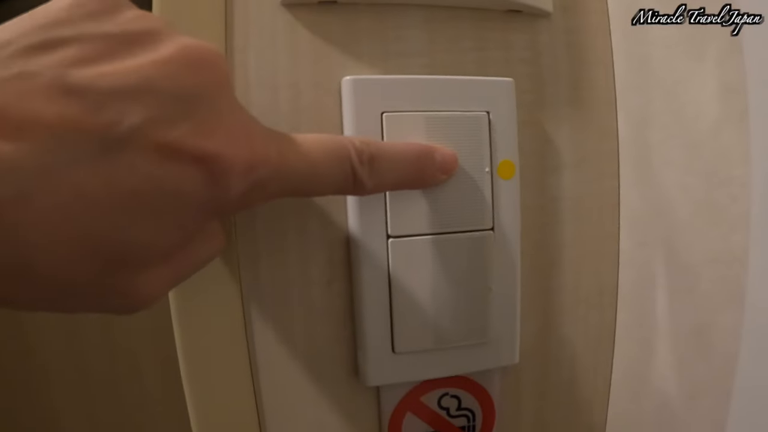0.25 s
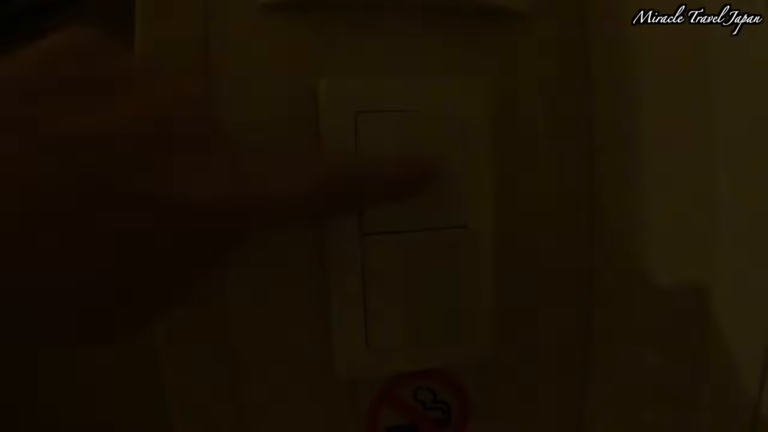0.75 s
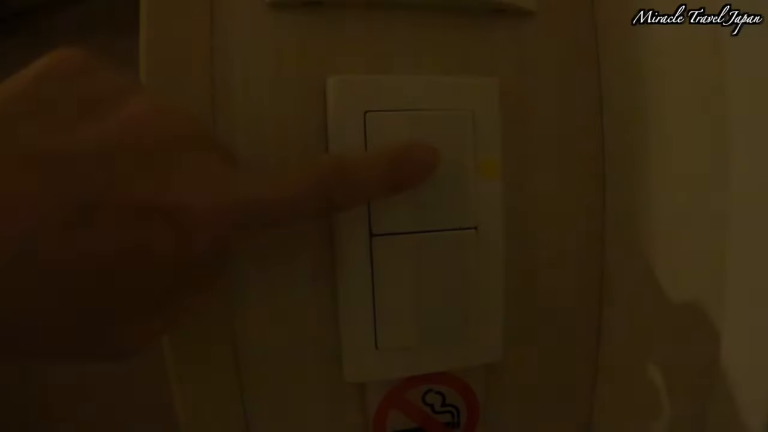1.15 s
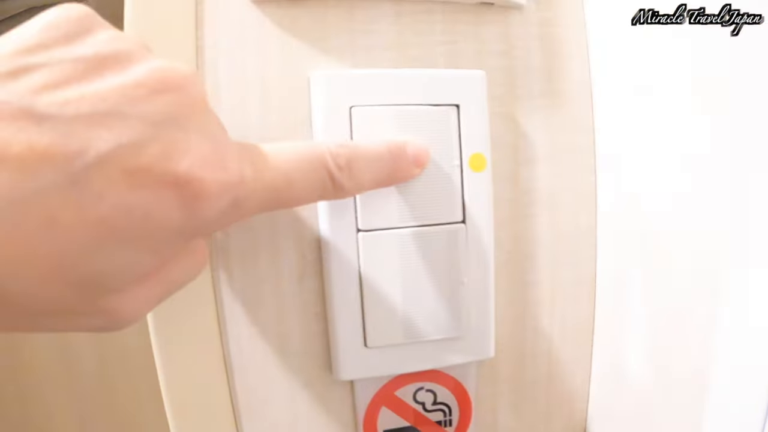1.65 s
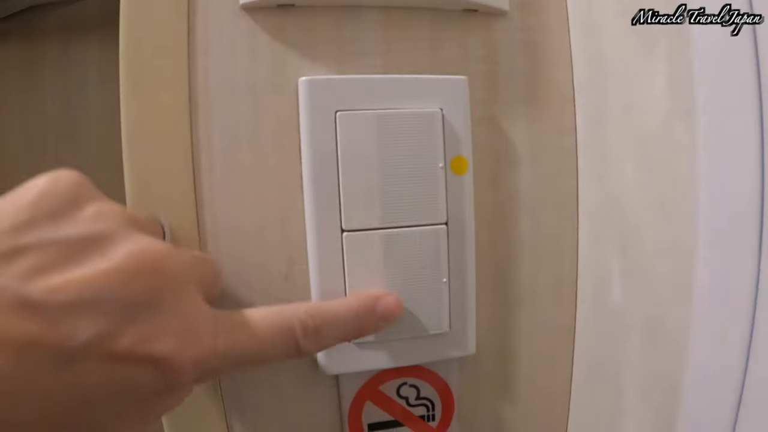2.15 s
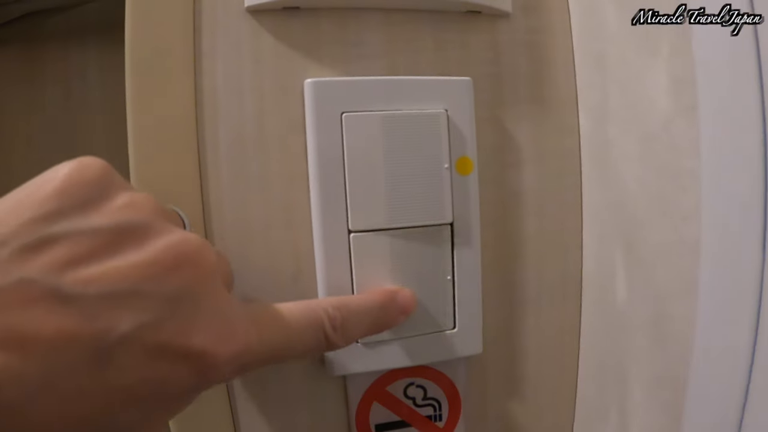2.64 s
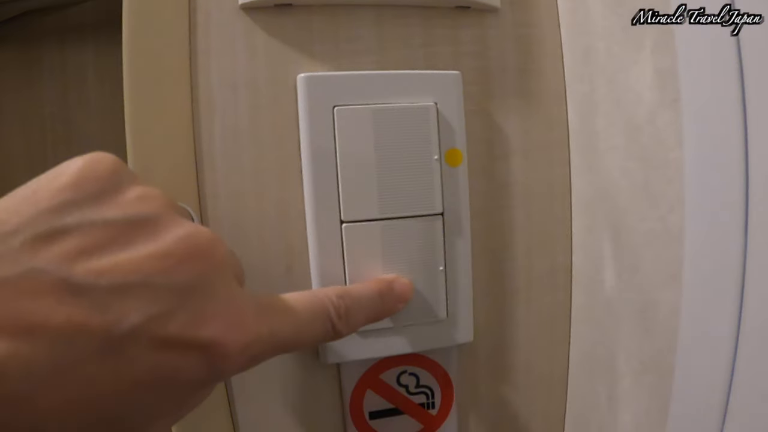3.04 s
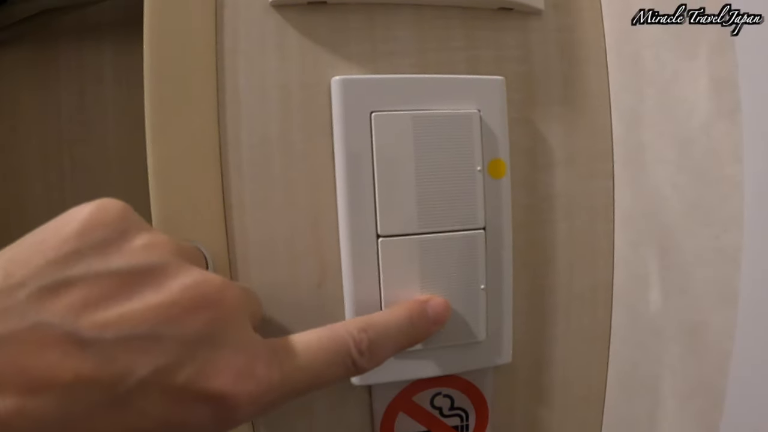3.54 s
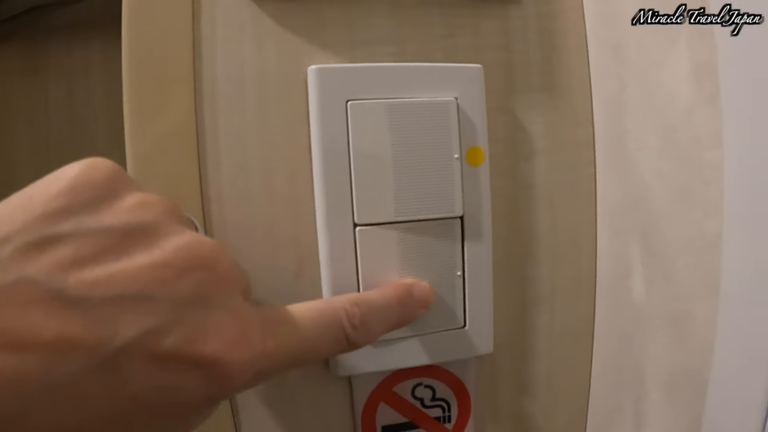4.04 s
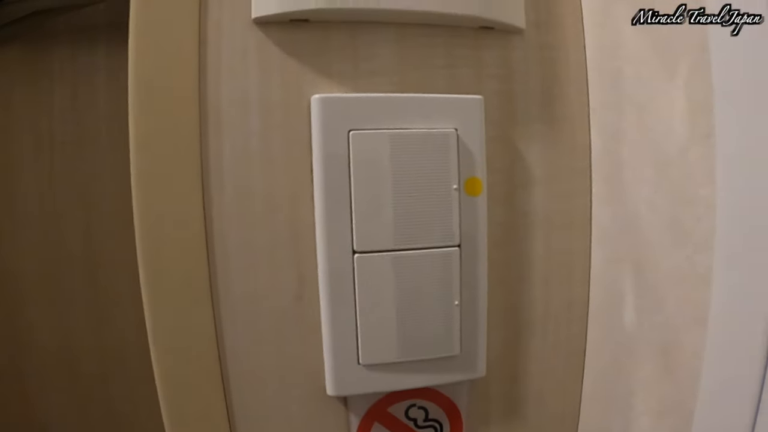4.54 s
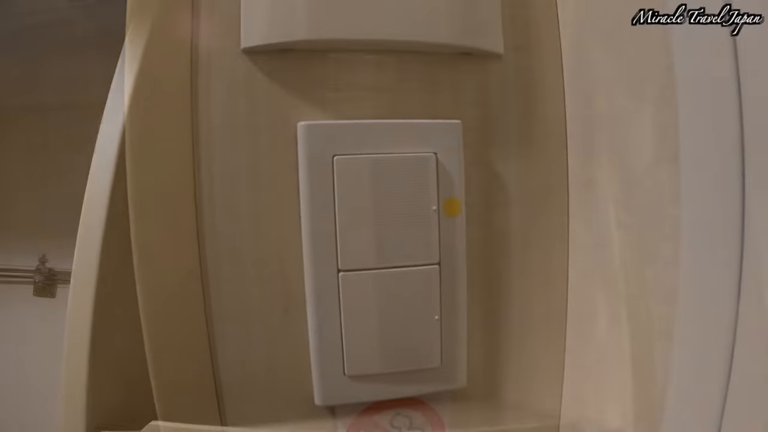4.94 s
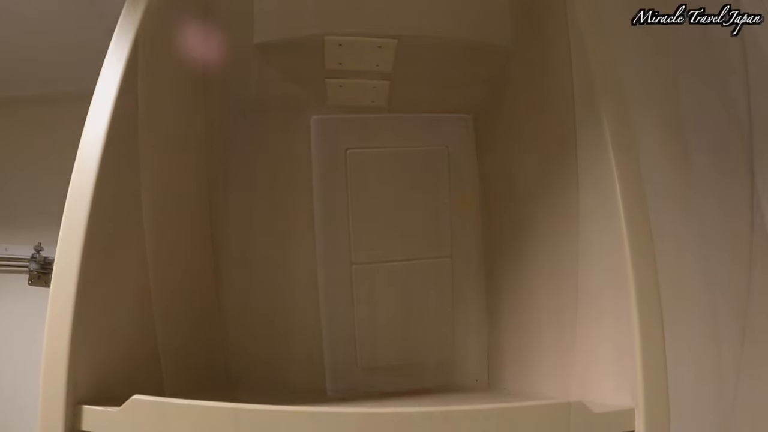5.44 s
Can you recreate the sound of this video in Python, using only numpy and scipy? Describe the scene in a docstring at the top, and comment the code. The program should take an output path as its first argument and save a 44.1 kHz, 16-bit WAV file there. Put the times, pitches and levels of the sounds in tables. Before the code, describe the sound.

A deep, boomy ship engine hum around 100 Hz wavers throughout, with lower rumble, hull drone, very faint air hiss and barely audible fan whine. Close to the microphone, a finger works plastic rocker switches on a hollow panelled wall. A small touch tick at 0.3 s leads to a loud, bright snap with a woody thump at 0.5 s, then a lighter release click at 0.77 s. The pattern repeats: snap at 1.65 s, release at 1.95 s; snap at 2.7 s, a softer stuttering release at 3.1 s; snap at 3.85 s, release at 4.15 s. Soft touches and short skin rubs come before many clicks. Each crack is dry and very short, with a faint springy ring and brief small-room echo. From 4.2 to 5.3 s the background crossfades to another place aboard, with thinner mid drone and slightly clearer whine; low hum continues to the end, about 5.5 s.

```python
"""Plastic rocker switches are worked by a finger on the panelled wall of a ship cabin, close to a camera.
Throughout, filtered noise makes the hull's wavering engine hum, rumble, drone, ventilation hiss and fan whines.
Skin and plunger rub as noise through the plastic modes; each contact then cracks by ringing those modes,
thumps the modes of the hollow wall a moment later, and dies in the cabin's diffuse echoes.
From 4.2 s to 5.3 s a crossfade leads to another place aboard, where drone and whines differ."""
import sys
import numpy as np
from scipy import signal
from scipy.fft import rfft, irfft, next_fast_len
from scipy.io import wavfile
from scipy.ndimage import uniform_filter1d

SR = 44100
rng = np.random.default_rng(int(sys.argv[2]) if len(sys.argv) > 2 else 0)


def digitize_waveform(pressure):
    """Quantize a signal to 16-bit integers and store it at the path in sys.argv[1].

    Rows of a 2-D input are taken as channels; values are limited to [-1, 1].
    """
    field = np.atleast_2d(pressure).T
    bounded = np.clip(field, -1, 1)
    quanta = np.round(bounded * 32767).astype(np.int16)
    wavfile.write(sys.argv[1], SR, quanta)


N = 250929  # length in samples

# Noise spectra of the ship. Each row: frequency in Hz, relative density in dB per Hz.
HUM_SPECTRUM = [(30, -150), (60, -45.5), (74, -10.5), (84, 2.5), (93, 4), (99, 1), (105, -25.5),
                (130, -83.5), (250, -170)]  # the hull's booming resonance
RUMBLE_SPECTRUM = [(8, -61), (14, -24), (22, -10), (31, -0.5), (40, -7), (50, -5.5), (62, -12.5), (72, -28),
                   (110, -120)]
DRONE_SPECTRUM = [(62, -31), (105, 1.5), (118, -9), (183, -10), (201, -10.5), (220, -26), (253, -15),
                  (314, -25.5), (337, -27), (365, -24.5), (408, -31.5), (431, -38.5), (700, -58.5),
                  (910, -87.5), (1540, -120)]
AIR_SPECTRUM = [(350, -31.5), (600, -5), (779, -9.5), (824, -11), (1270, -7.5), (3170, -20.5),
                (3890, -25.5), (7260, -23), (9000, -38), (11700, -59.5), (19800, -120)]
# Stereo width of the ship noise. Each row: frequency in Hz, side minus mid in dB.
SHIP_SIDE = [(60, -41.5), (110, -34.5), (200, -28.5), (360, -17), (660, -4.5), (1200, -3.5), (2190, -5.5),
             (3980, -2.5), (7240, -5), (13200, -1)]
# Fan whines. Each row: frequency in Hz, width in Hz, level in the first place in dB, in the second in dB.
WHINES = [(514, 34, -72.5, -64.5), (764, 29, -79, -82)]
# The crossfade to another place aboard, where drone and whines differ: start in seconds, end in seconds.
CROSSFADE_S = (4.2, 5.3)
# Gain on the drone in the second place. Each row: frequency in Hz, gain in dB.
SECOND_DRONE_GAIN = [(130, 0), (260, -10), (450, -3.5)]
# Cabin echoes by octave band. Each row: centre in Hz, decay time t60 in seconds, relative level in dB.
CABIN_BANDS = [(250, 0.57, -17.5), (493, 0.31, -11), (1063, 0.25, -12.5), (2020, 0.26, -18.5),
               (4220, 0.24, -19.5), (7000, 0.15, -15.5), (12100, 0.14, -27)]
# Stereo width of the echoes. Each row: frequency in Hz, side minus mid in dB.
CABIN_SIDE = [(60, -49), (110, -47.5), (200, -27.5), (360, -17), (660, -9), (1200, -7), (2190, -6),
              (3980, -4.5), (7240, -6), (13200, 0.5)]
# Skin and plunger sliding. Each row: start in seconds, swell in ms, fade in ms, rms at the crest in dB.
RUBS = [(0.255, 24, 61, -63), (0.738, 40, 15, -50.5), (1.442, 11, 34, -75), (1.516, 10.6, 20, -69.5),
        (1.917, 58, 15, -51), (2.414, 38, 28, -61.5), (2.549, 12, 28, -77), (3.041, 74, 23, -53),
        (3.624, 40, 28, -69.5), (4.107, 55, 29, -50)]
# Modes of the plastic rocker, its thin top and the wall panel.
# Each row: frequency in Hz, relative level in dB, decay time t60 in seconds.
ROCKER_MODES = [(1660, -7.5, 0.0019), (1890, 4.5, 0.0046), (2824, -2, 0.0067), (3575, 2, 0.0049),
                (4345, -4.5, 0.0091), (4770, -5, .005)]
TOP_MODES = [(5770, -2.5, 0.0036), (6770, -0.5, 0.0029), (7520, 0, 0.0037), (8390, -6.5, 0.0048),
             (9370, -8.5, 0.0026), (11600, -11.5, 0.0022)]
WALL_MODES = [(236, -10, 0.069), (389, -10, 0.092), (452.6, -0.5, 0.046), (477, 1, 0.032), (586, -1, 0.031),
              (912, -10.5, 0.028), (1065, -8, .05), (1210, -6, 0.0067)]
# Contacts: touch, snap, slips and release. Each row: start in seconds, peak of the crack in dB, peak of
# the thin top in dB, peak of the wall thump in dB, thump lag in ms, favoured rocker pitch in Hz.
CONTACTS = [(0.2677, -55.5, -56, -47, 3.4, 4500), (0.2858, -35.5, -38, -33.5, 0.72, 1750),
            (0.5038, -13, -16, -4, 2.9, 3600), (0.7721, -23, -37.5, -33.5, 4.5, 2896),
            (0.7747, -22, -32, -24, 3.94, 3270), (1.4491, -54.5, -58.5, -39.5, 1.5, 1897),
            (1.6499, -8.5, -15, -7, 3, 3960), (1.922, -41, -53.5, -53, 2.3, 3900),
            (1.9458, -47, -39.5, -39.5, 2.2, 3600), (1.956, -16, -33.5, -22, 4.3, 3600),
            (2.4421, -49, -51, -36, 0.86, 2900), (2.4580, -49, -58.5, -25, 0.96, 1900),
            (2.5526, -56.5, -67.5, -44, 1.9, 4220), (2.708, -15, -18, -4, 2.56, 3160),
            (3.072, -46, -42.5, -45.5, 1.9, 2017), (3.0859, -41.5, -36, -47, 1.6, 2500),
            (3.0967, -38, -44, -39.5, 2.5, 2530), (3.1006, -30.5, -32.5, -37, 3.15, 3020),
            (3.1058, -29, -35.5, -28.5, 5.5, 3480), (3.6379, -53, -53, -43.5, 2.2, 3020),
            (3.6469, -52, -61, -36, 2.2, 3013), (3.691, -48, -52, -44.5, 1.1, 3010),
            (3.8554, -11.5, -15, -5.5, 2.5, 2804), (4.1068, -51, -66.5, -45.5, 2.32, 2198),
            (4.126, -37.5, -48, -54, 2.5, 3000), (4.1316, -40, -38.5, -45, 3, 3900),
            (4.1579, -20, -28.5, -20.5, 4.5, 2580), (5.4934, -60.5, -58, -47, 1.3, 3000)]
# Springs that sing on after a snap. Each row: start in s, frequency in Hz, level in dB, t60 in s.
SPRINGS = [(.505, 10320, -52, 0.23), (.505, 13760, -60, 0.16), (0.775, 1130, -55, 0.45),
           (1.652, 1740, -43, 0.33), (1.958, 1098, -43, 0.35), (2.71, 1750, -46.5, 0.42),
           (2.71, 11660, -70, 0.69), (2.708, 12310, -73, 0.96), (4.158, 3080, -43, 0.13)]

HUM_DB, RUMBLE_DB, DRONE_DB, AIR_DB = -28.5, -33, -33.5, -72  # mid rms about which the level may wander
RATTLE_MS = 2.01  # time scale of the tiny impacts
WALL_PUSH_S = 0.00073  # length of the blow on the panel
FAVOUR_DB_PER_OCT = 6.5  # rocker modes fall off away from the favoured pitch
HARD_DB, LIGHT_ROOM_DB = -15, -5.5  # contacts with a thump not above HARD_DB stir the cabin less
TOP_HZ = 14200  # upper limit of the camera's sound


def undb(db):
    """Amplitude ratio of a level in decibels."""
    return 10 ** (np.asarray(db) / 20)


def shape(points, n):
    """Gain per Fourier bin, interpolated in dB over log frequency."""
    hz, db = np.transpose(points)
    bin_hz = np.arange(n // 2 + 1) * SR / n + 1e-9
    return undb(np.interp(np.log(bin_hz), np.log(hz), db))


def colour(x, points):
    """Linear filtering as multiplication of the spectrum by a gain curve."""
    n = next_fast_len(x.shape[-1])
    return irfft(rfft(x, n) * shape(points, n), n)[..., :x.shape[-1]]


def unit(x):
    """Normalisation to an rms of 1."""
    return x / np.sqrt(np.mean(x ** 2))


def spread(mid, side):
    """Sum and difference stereo: left is mid plus side, right is mid minus side."""
    return np.array([mid + side, mid - side])


def wide_noise(points):
    """Coloured noise with a mid of rms 1; an independent side decorrelates the treble most."""
    mid, side = colour(rng.standard_normal((2, N)), points)
    return spread(mid, colour(side, SHIP_SIDE)) / np.sqrt(np.mean(mid ** 2))


def walk(rate):
    """Random fluctuation: levels held for 1 / rate s, then smoothed by two moving averages."""
    hold = int(SR / rate)
    levels = np.repeat(rng.standard_normal(N // hold + 1), hold)
    return 1.3 * uniform_filter1d(uniform_filter1d(levels, hold), hold)[:N]


def ring(modes, seconds, detune=0., sign=-1, damp=1.):
    """Modal impulse response: a sum of decaying sines; alternating signs avoid notches between modes."""
    t = np.arange(int(seconds * SR)) / SR
    hz, db, t60 = np.transpose(modes)[:, :, None]
    signs = sign ** np.arange(len(modes))[:, None]
    decay = undb(db - 60 * damp * t / t60)
    return np.sum(signs * decay * np.sin(2 * np.pi * hz * (1 + detune) * t), axis=0)


def peak(x, db):
    """Normalisation to a peak level in dB."""
    return x * undb(db) / np.abs(x).max()


def add(out, s, x):
    """Superposition: x is summed into out from s seconds on."""
    i = int(s * SR)
    out[i:i + len(x)] += x[:len(out) - i]


def drone(second_place):
    """Broadband hull vibration as coloured noise, crossfaded to a filtered copy for the second place."""
    first = wide_noise(DRONE_SPECTRUM) * undb(DRONE_DB + 1.4 * walk(14.0))
    return (1 - second_place) * first + second_place * colour(first, SECOND_DRONE_GAIN)


def fan_whines(second_place):
    """Narrowband noise: a small bandwidth gives a faint, unsteady pitch."""
    out = 0
    for hz, width, first_db, second_db in WHINES:
        band = [(hz - 2 * width, -60), (hz - width / 2, 0), (hz + width / 2, 0), (hz + 2 * width, -60)]
        out = out + wide_noise(band) * undb(first_db + (second_db - first_db) * second_place)
    return out


def ship():
    """Superposed noise sources: narrowband hum wavers by itself; rumble, drone and air wander in level."""
    second_place = np.interp(np.arange(N) / SR, CROSSFADE_S, [0, 1])
    hum = wide_noise(HUM_SPECTRUM) * undb(HUM_DB)
    rumble = wide_noise(RUMBLE_SPECTRUM) * undb(RUMBLE_DB + 0.37 * walk(2.8))
    air = wide_noise(AIR_SPECTRUM) * undb(AIR_DB + 0.37 * walk(57))
    return hum + rumble + drone(second_place) + air + fan_whines(second_place)


def cabin(x):
    """Diffuse reverberation: convolution with octave bands of noise, each with its own decay."""
    t = np.arange(SR // 2) / SR
    tail = 0
    for hz, t60, db in CABIN_BANDS:
        octave = [(hz / 2, -40), (hz / 1.4, -3), (hz, 0), (hz * 1.4, -3), (hz * 2, -40)]
        band = colour(rng.standard_normal((2, len(t))), octave)
        tail = tail + band * undb(db - 60 * t / t60)
    build_up = np.clip((t - .003) / 0.004, 0, 1)  # from 3 to 7 ms
    early = 1 + 0.99 * np.exp(-t / 0.021)  # nearby furniture answers first
    tail = tail * build_up * early * undb(-18.5)
    echoes = spread(tail[0], colour(tail[1], CABIN_SIDE))
    return signal.fftconvolve(x[None], echoes, axes=1)[:, :N]


def rubbing():
    """Sliding friction: uneven micro-slips excite the same plastic modes."""
    slips = rng.standard_normal(N) * undb(4 * walk(300))
    plastic = ring(ROCKER_MODES, .03) + undb(-1.0) * ring(TOP_MODES, .03)
    hiss = unit(signal.fftconvolve(slips, plastic)[:N])
    pressure = np.zeros(N)
    for s, swell_ms, fade_ms, db in RUBS:
        swell = np.linspace(-16, 0, max(int(swell_ms * SR / 1000), 2))  # dB below the crest
        fade = np.linspace(0, -16, max(int(fade_ms * SR / 1000), 2))
        add(pressure, s, undb(db + np.r_[swell, fade]))
    return hiss * pressure


def springs(out):
    """Free vibration: each spring inside the switch is one sine of exponential decay."""
    for s, hz, db, t60 in SPRINGS:
        add(out, s, ring([(hz, db, t60)], t60))


def switch():
    """Impact excitation: a rattle of tiny impacts rings the rocker; the blow reaches the wall later."""
    body, top, thump, radiated = np.zeros((4, N))
    t = np.arange(int(.03 * SR)) / SR
    u = t / (RATTLE_MS / 1000)
    rattle_envelope = u * np.exp(-2 * u)
    push = np.hanning(int(WALL_PUSH_S * SR))
    panel = signal.fftconvolve(push, ring(WALL_MODES, .15, sign=1))
    # summed over all directions, the cabin receives equal energy but, by heavier damping, smoother colour
    smooth = [ring(ROCKER_MODES, .03, damp=2), ring(TOP_MODES, .03, damp=2),
              signal.fftconvolve(push, ring(WALL_MODES, .15, damp=2))]
    for s, body_db, top_db, wall_db, lag_ms, favour_hz in CONTACTS:
        struck = [(hz, db - FAVOUR_DB_PER_OCT * abs(np.log2(hz / favour_hz)), t60)
                  for hz, db, t60 in ROCKER_MODES]
        rattle = rng.standard_normal((2, len(t))) * rattle_envelope
        bend = .02 * rng.standard_normal((2, 6, 1))  # the finger's grip shifts the modes
        crack = signal.fftconvolve(rattle[0], ring(struck, 0.024, bend[0]))
        tick = signal.fftconvolve(rattle[1], ring(TOP_MODES, .03, bend[1]))
        parts = [peak(crack, body_db), peak(tick, top_db), peak(panel, wall_db)]
        room = undb(0 if wall_db > HARD_DB else LIGHT_ROOM_DB)
        for out, lag, part, even in zip((body, top, thump), (0, 0, lag_ms / 1000), parts, smooth):
            add(out, s + lag, part)
            equal_energy = np.linalg.norm(part) / np.linalg.norm(even)
            add(radiated, s + lag, room * even * equal_energy)
    springs(thump)
    return body, top, thump, radiated


def scene():
    """Superposition of direct sound, cabin echoes and ship noise."""
    body, top, thump, radiated = switch()
    rub = rubbing()
    # a little to the right: the rocker's crack is one sample earlier and louder there
    crack = np.array([np.roll(body, 1) * undb(-1.2), body * undb(1.2)])
    near = crack + top + rub + thump * undb([[-.4], [.4]])
    return near + cabin(radiated + rub) + ship()


def record(dry):
    """Band limitation: the camera cuts the top with a steep elliptic low-pass."""
    low_pass = signal.ellip(8, .2, 70, TOP_HZ, fs=SR, output="sos")
    return signal.sosfilt(low_pass, dry)


dry = scene()
out = record(dry)
digitize_waveform(out)
```